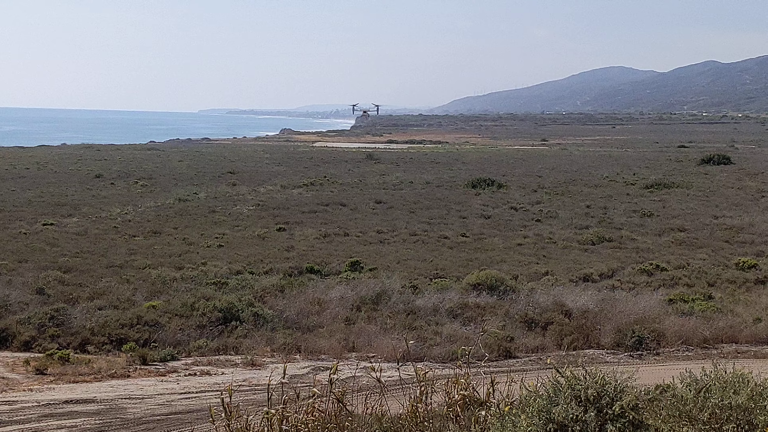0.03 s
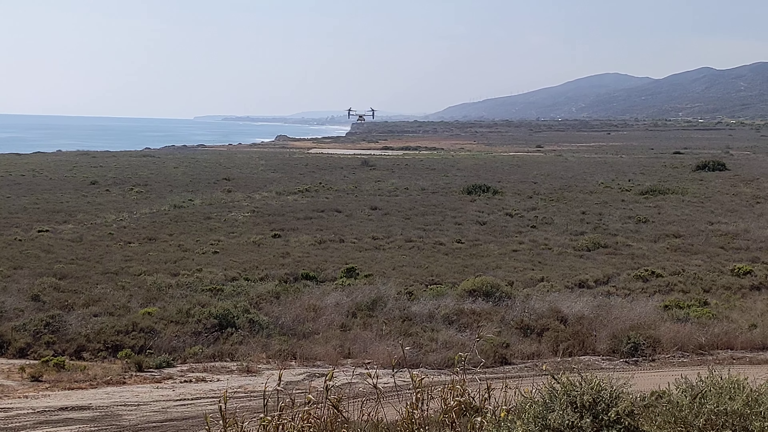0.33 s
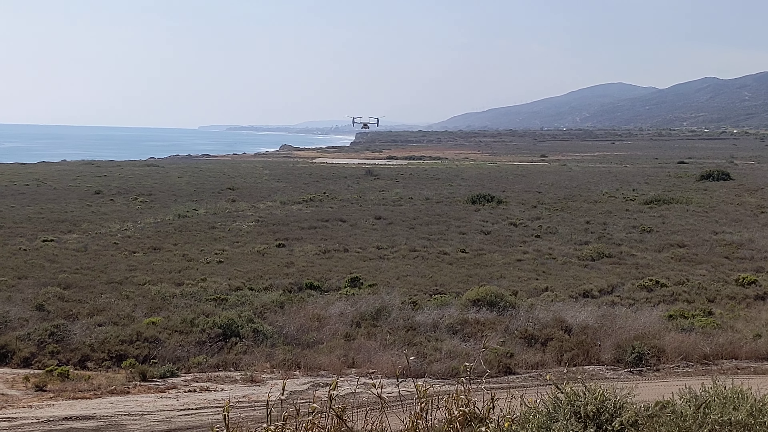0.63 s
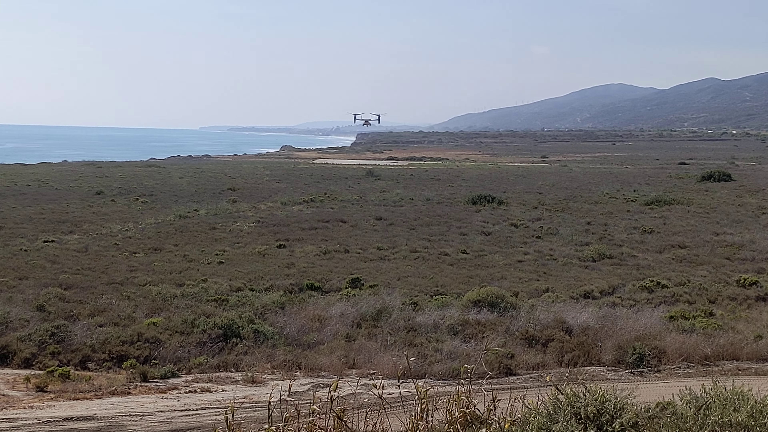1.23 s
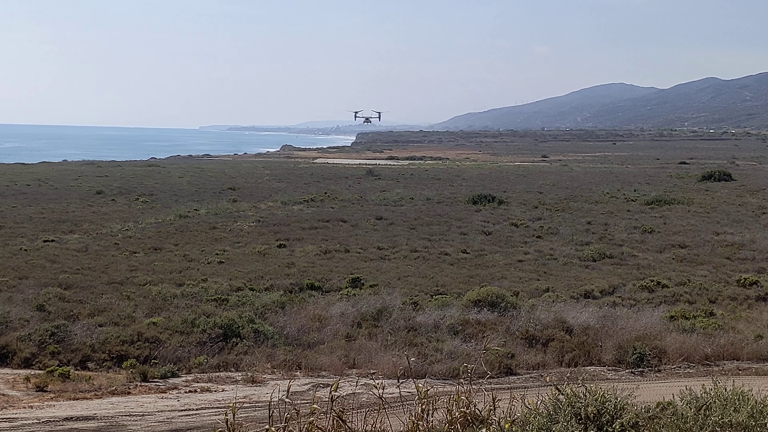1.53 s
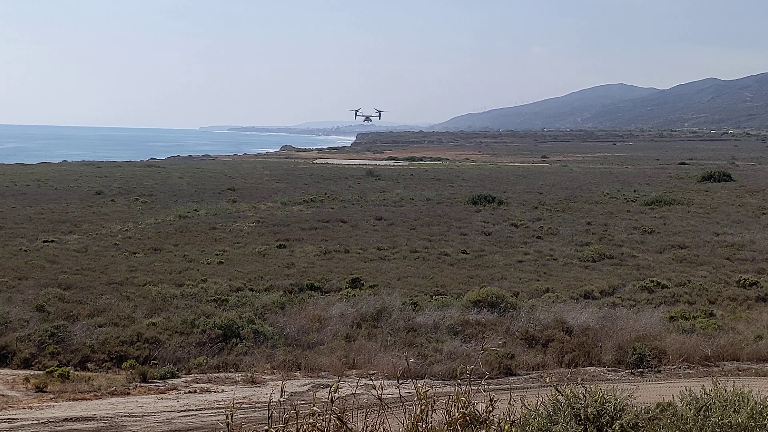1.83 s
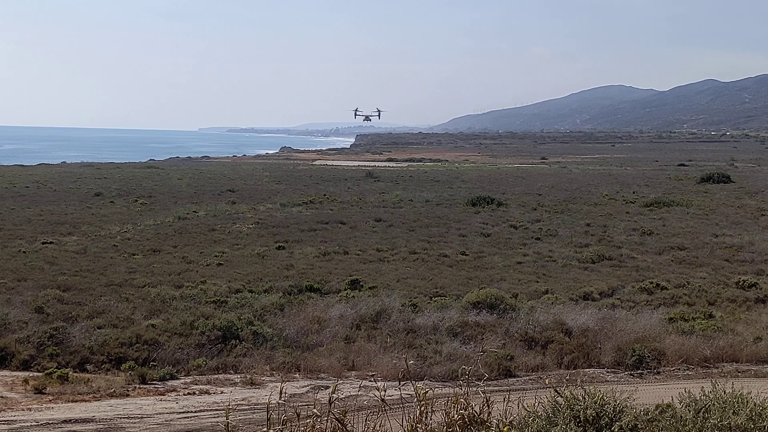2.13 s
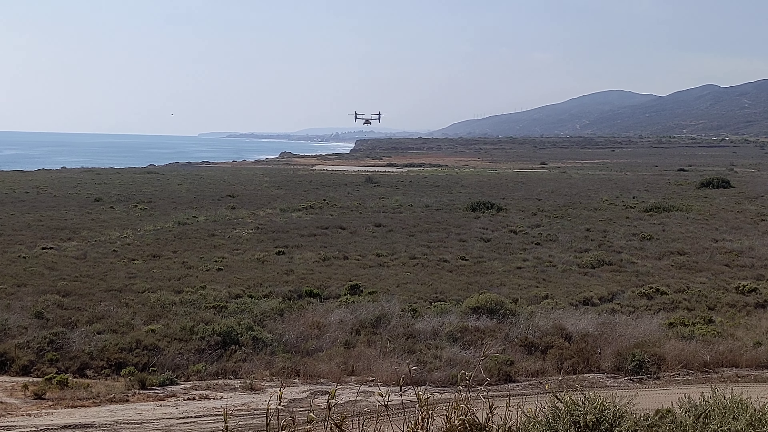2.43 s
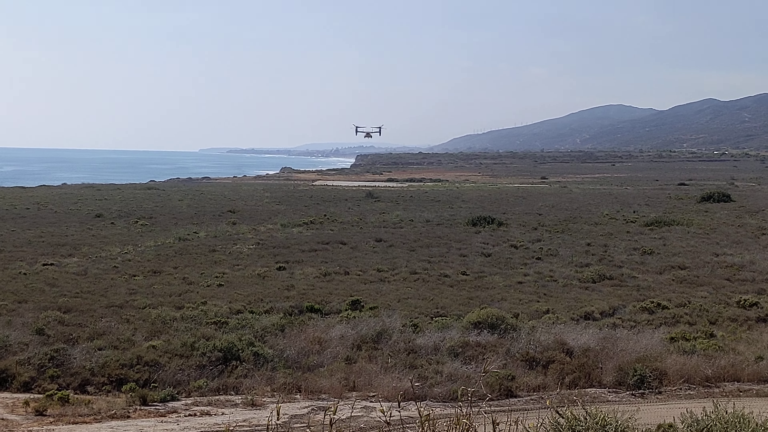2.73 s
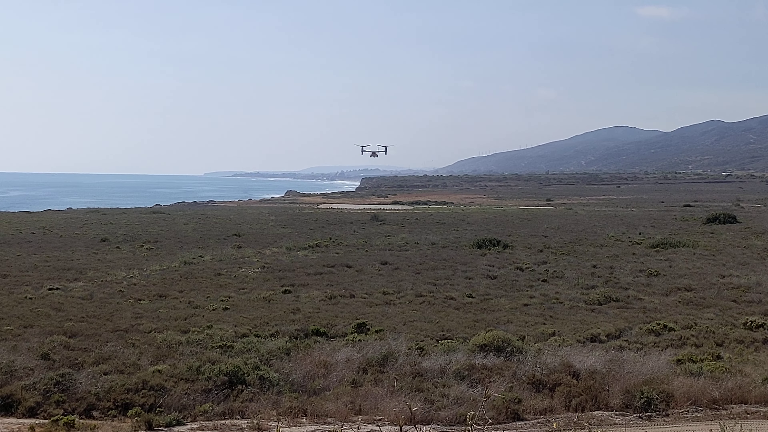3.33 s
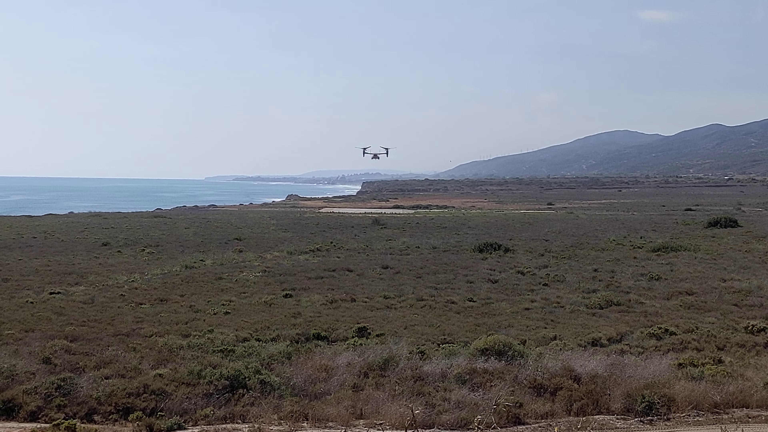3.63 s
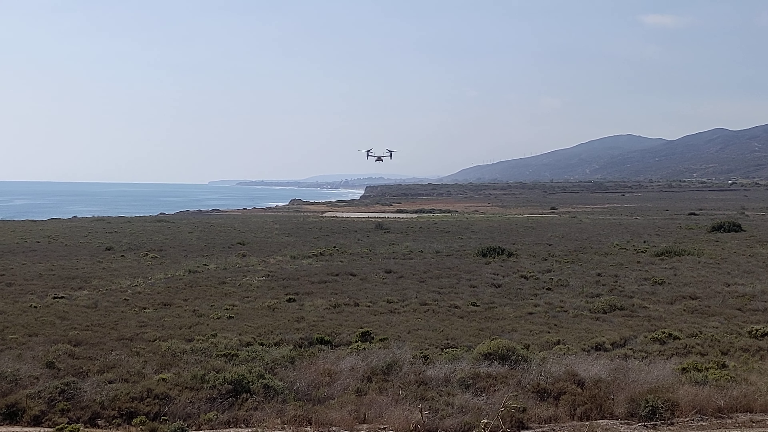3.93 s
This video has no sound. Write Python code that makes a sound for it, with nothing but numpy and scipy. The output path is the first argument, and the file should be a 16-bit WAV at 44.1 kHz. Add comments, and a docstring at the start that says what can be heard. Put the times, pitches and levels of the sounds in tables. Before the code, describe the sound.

Distant aircraft rotors beat rapidly over an engine roar, growing sharper as wind buffets the microphone.

```python
"""A far tiltrotor approaches over coastal scrub, its blades a soft flutter, about 20 beats a second, in a
roar of engines and rotor wash hollowed by a ground reflection. Dry grass hisses throughout.
From 1.1 s gusts buffet the left microphone harder; small clicks and a faint squeak sit close right.
From 2.4 s the beats harden into slaps and cracks as the blades cut their tip vortices.
A brief hum falls on the left near 2.7 s, and dry stalks brush together just before the end."""
import sys
import numpy as np
from scipy import signal
from scipy.fft import rfft, irfft
from scipy.io import wavfile

SR = 44100
rng = np.random.default_rng(int(sys.argv[2]) if len(sys.argv) > 2 else 0)


def unload_audio(sound):
    """Save the sound as a 16-bit wav file, at the path given as the first command line argument."""
    columns = np.transpose(np.atleast_2d(sound))
    # keep every value between -1 and 1, then stretch to whole-number steps
    steps = np.round(np.clip(columns, -1, 1) * 32767)
    wavfile.write(sys.argv[1], SR, steps.astype(np.int16))


N = 176400
TIME, FREQ = np.arange(N) / SR, np.fft.rfftfreq(N, 1 / SR)

# Noise colours of grass, wind, roar and cracks (frequency [Hz], level [dB/Hz] at 0 dB gain)
GRASS_EQ = [(2000, -105), (4500, -100.5), (6000, -101), (8500, -106), (11000, -113), (15500, -117)]
TUFT_EQ = [(3000, -112), (4500, -91), (5600, -94), (6700, -101), (8000, -118), (12000, -132)]
BRUSH_EQ = [(3000, -112), (6000, -103), (8500, -101), (15000, -119)]
RUMBLE_EQ = [(25, -63.5), (40, -47.5), (60, -39), (100, -42.5), (160, -48.5), (240, -56), (400, -71),
             (1000, -100), (4000, -150)]
EDDY_EQ = [(50, -63.5), (140, -51.5), (200, -48.5), (290, -50), (400, -55.5), (620, -61.5), (1000, -89),
           (2000, -102), (6000, -145)]
ROAR_EQ = [(40, -61.5), (100, -58.5), (200, -59.5), (320, -65.5), (500, -70.5), (750, -70), (1300, -71),
           (1900, -75), (2500, -76), (3000, -85.5), (3900, -91), (5000, -103), (8000, -125)]
FLARE_EQ = [(1200, -89), (1900, -73), (2750, -70), (3200, -84), (4500, -115)]
CRACK_EQ = [(150, -60.5), (400, -59.5), (700, -50), (900, -54), (1250, -59.5), (1600, -69), (2500, -79.5),
            (6000, -130), (12000, -160)]
RASP_EQ = [(700, -80.5), (1400, -65), (1900, -66.5), (2500, -69), (3100, -79.5), (4000, -86.5),
           (6000, -110), (12000, -150)]
# Level rides (time [s], gain [dB])
GRASS_RIDE = [(0, -6), (1.1, -4.5), (1.4, -1.5), (1.85, 0), (2.3, -3.5), (3.6, -3), (3.8, -1), (4, -1)]
TUFT_RIDE = [(0, -9), (.4, -4), (1.05, -5.5), (1.35, -11), (1.5, -16), (3.95, -18)]
ROAR_RIDE = [(0, -2.9), (.18, -1.8), (.3, 1.2), (.5, 0.2), (1.0, -0.11), (1.6, -2.5), (2.2, -0.35),
             (2.7, 1.3), (3.7, 0.95), (4, 1.5)]
SOFT_SLAP_RIDE = [(0, -31.5), (.7, -32), (1.0, -23.5), (1.5, -26.5), (2.2, -30), (2.52, -27.5),
                  (2.68, -18.5), (2.82, -23.5), (3.27, -21), (3.6, -16), (4, -21)]
CRACK_RIDE = [(0, -15), (.5, -17), (.9, -14), (1.0, -7), (1.08, -13.5), (1.4, -11.5), (1.69, -12.5),
              (1.74, -7.5), (1.79, -12), (2.03, -11.5), (2.08, -7.5), (2.25, -10), (2.52, -4.5), (2.72, -5),
              (2.82, -0.5), (2.97, -3.5), (3.07, -2), (3.17, -6), (3.22, -0.5), (3.41, -10.5), (3.46, -3.5),
              (3.55, 1.5), (3.61, 1.5), (3.66, 2.5), (3.71, 4.5), (3.77, 4), (3.82, -10.5), (3.87, -2),
              (4, -11)]
# Swells of brushing stalks and of brightness in the roar (time [s], half length [s], gain [dB])
BRUSHES = [(3.785, .035, 1), (3.94, .06, -2)]
FLARES = [(.47, .03, 0)]
# Rubbing squeaks (start [s], length [s], stick-slip rate [Hz], level [dB])
SQUEAKS = [(1.295, .08, 473, -60), (3.89, .055, 331, -61)]
# Close clicks (time [s], level re CLICK_DB [dB], left minus right [dB])
CLICKS = [(.308, -23, -12), (1.234, -18, -9), (1.365, -17, -13), (1.387, 7.5, -24), (2.272, -10, -9)]
# Ring of a click (frequency [Hz], relative level [dB])
CLICK_MODES = [(2950, 7), (3400, -6), (5500, 0), (6280, -1.5), (6500, -3), (7000, 0.5), (8480, -6),
               (8780, -5), (10620, -13), (13220, -15)]
# Gusts (time [s], half length [s], rumble gain [dB], eddy gain [dB])
GUSTS = [(.28, 0.06, 3, 0), (0.422, 0.024, 1.5, 1.5), (0.557, 0.16, -3, -20.5), (0.738, 0.026, 2.5, -14.5),
         (1.173, 0.041, 5.5, 4), (1.297, 0.077, 1.5, 8), (1.415, 0.07, 4, -4), (1.503, 0.025, 3.5, 0.5),
         (1.561, .025, 0.5, -6.5), (1.781, 0.037, 0.5, -2.5), (1.867, 0.028, 3, 4), (1.944, .02, -2.5, -1),
         (2, 0.02, -3, 3), (2.115, 0.05, -1, -2), (2.672, 0.077, -2, -3.5), (3.393, 0.059, 4, -2.5),
         (3.651, 0.064, 1.5, -2), (3.767, 0.034, 5.5, -3)]
# Thumps of large eddies (time [s], pitch [Hz], level [dB])
THUMPS = [(1.194, 198, -9), (1.264, 170, -8), (1.368, 130, -10), (1.5, 110, -7), (1.549, 110, -9),
          (1.767, 170, -11.5)]
# Path of the falling hum (time [s], pitch [Hz], level [dB])
HUM_PATH = [(2.62, 315, -55), (2.655, 300, -20), (2.745, 250, -27), (2.80, 219, -36), (2.88, 205, -55)]
# Stereo image of the aircraft (frequency [Hz], left minus right [dB], left phase lead [rad])
MIC_IMAGE = [(60, 11, -1), (300, -2, .2), (560, 5.5, 0.89), (710, .5, 0.24), (1015, -0.5, 1.66),
             (1239, 7, 1.11), (1645, 8, 4), (1760, -1, 6.7), (2180, 6, 7), (2570, -10.5, 8), (2990, 1, 8),
             (3730, 4, 9), (3900, 3, 10), (5000, 7, 10)]
# Tempo of the blades (time [s], beat rate [Hz])
BEAT_RATE = [(0, 20.44), (1.3, 20.42), (2.0, 20.33), (2.6, 20.25), (3.2, 20.21), (4, 20.2)]
# Rotor drone partials (multiple of the beat rate, relative level [dB])
DRONE_PARTIALS = [(2, -33.5), (3, -33.5), (4, -36.5), (5, -44), (6, -46), (7, -56.5)]
# Accented blade slaps (time [s], level [dB], pitch [Hz])
HARD_SLAPS = [(2.376, -20.5, 270), (2.624, -15.5, 264), (2.920, -11, 250), (3.069, -13.5, 278),
              (3.119, -9.5, 275), (3.169, -10.5, 282), (3.219, -10.5, 290), (3.317, -14.5, 255),
              (3.368, -11, 289), (3.467, -13.5, 300), (3.517, -16, 253), (3.566, -14, 265),
              (3.715, -6.5, 311), (3.764, -14.5, 328), (3.816, -15.5, 317)]
# Master fade (time [s], gain [linear])
MASTER_FADE = [(.03, 0), (.05, 1), (3.994, 1), (4, 0)]

CLICK_DB, CLICK_RING_S, SNAP_DB, SNAP_S, CLICK_TAIL_DB, CLICK_TAIL_S = -48.5, .0048, 11.5, .0018, -17, .025
SQUEAK_HZ, SQUEAK_WIDTH_HZ, SQUEAK_SWEEP_HZ, SQUEAK_GLIDE, SQUEAK_ROUGH = 4300, 850, 800, .05, .006
BREEZE_LEFT_DB, BREEZE_RIGHT_DB, GUST_RIGHT_DB = -9, -10, -13
EDDIES_PER_S, EDDY_WASH_DB, THUMP_CYCLES = 300, -10, .59
GROUND_DELAY_S, GROUND_SHARE = .001887, .2
ROAR_SWAY_DB, ROAR_FLICKER_DB, DIFFUSE_DB = .56, .43, -6
DRONE_LAG_S, DRONE_RISE_DB_PER_S = .0029, 2.5
SLAP_HZ, SLAP_LAG_S, SLAP_RISE_S, SLAP_FALL_S, SLAP_SPREAD_DB = 275.6, .0003, .0033, .0052, 1.47
CRACK_WIDTH_S, CRACK_LEAD_S, CRACK_SPREAD_DB, SCRUB_TAIL_DB, SCRUB_TAIL_S = .0045, .0016, .72, -7.5, .018
RASP_FOLLOW = .53  # share of the crack's swing in dB that its bright edge follows
BEAT_ANCHOR_S = 3.169  # one blade passage lands here
LOW_CUT_HZ, HIGH_CUT_HZ = 35, 15750


def amp(db):
    """Decibels to gain."""
    return 10 ** (np.asarray(db) / 20)


def curve(points, t=TIME):
    """Reads a table over time."""
    return np.interp(t, *np.transpose(points))


def over_hz(points, column=1):
    """Reads a table over log frequency."""
    table = np.array(points)
    return np.interp(np.log(FREQ + 1), np.log(table[:, 0]), table[:, column])


def colour(x, eq):
    """Gives white noise a spectrum in dB per Hz."""
    return irfft(rfft(x) * amp(over_hz(eq)) * np.sqrt(SR / 2), N)


def drift(rate_hz):
    """Smooth random modulator of unit spread."""
    x = irfft(rfft(rng.standard_normal(N)) * np.exp(-(FREQ / rate_hz) ** 2), N)
    return x / x.std()


def add(mix, start_s, sound):
    """Drops a sound into the mix."""
    part = mix[..., round(start_s * SR):][..., :sound.shape[-1]]
    part += sound[..., :part.shape[-1]]


def swells(rows, eq):
    """Coloured noise that comes and goes in brief swells."""
    envelope = sum(amp(db) * np.exp(-((TIME - s) / half) ** 2) for s, half, db in rows)
    return colour(rng.standard_normal(N), eq) * envelope


def grass():
    """A wide, grainy bed of dry grass, with brushing stalks and a nearer tuft rustling on the right."""
    hiss = colour(rng.standard_normal((2, N)) * amp(curve(GRASS_RIDE) + .99 * drift(250)), GRASS_EQ)
    tuft = colour(rng.standard_normal(N) * amp(curve(TUFT_RIDE) + 1.8 * drift(60)), TUFT_EQ)
    stalks = np.array([swells(BRUSHES, BRUSH_EQ), swells(BRUSHES, BRUSH_EQ)])
    return hiss + stalks + tuft * amp([[-9], [0]])


def squeaks():
    """Something sticks and slips: slightly rising harmonics through one high, upswept resonance."""
    out = np.zeros(N)
    for s, length, rate_hz, db in SQUEAKS:
        progress = np.clip((TIME - s) / length, 0, 1)
        pitch_hz = rate_hz * (1 + SQUEAK_GLIDE * (progress - .5) + SQUEAK_ROUGH * drift(300))
        phase = 2 * np.pi * np.cumsum(pitch_hz) / SR
        peak_hz = SQUEAK_HZ + SQUEAK_SWEEP_HZ * (progress - .5)
        tone = sum(np.exp(-((k * rate_hz - peak_hz) / SQUEAK_WIDTH_HZ) ** 2) * np.sin(k * phase)
                   for k in range(6, 18))
        out += amp(db) * np.sin(np.pi * progress) * tone
    return out * amp([[-4], [0]])


def clicks():
    """Small hard snaps with a brief high ring, panned right."""
    out, t = np.zeros((2, N)), np.arange(SR // 10) / SR
    snap_band = signal.butter(1, [2400, 8000], "band", fs=SR)
    for s, db, pan_db in CLICKS:
        ring = sum(amp(level) * np.sin(2 * np.pi * (hz * t + rng.random())) for hz, level in CLICK_MODES)
        ring *= np.exp(-t / CLICK_RING_S)
        snap = signal.lfilter(*snap_band, rng.standard_normal(len(t)))
        snap *= np.exp(-t / SNAP_S) + amp(CLICK_TAIL_DB) * np.exp(-t / CLICK_TAIL_S)
        add(out, s, amp(CLICK_DB + db) * (ring + amp(SNAP_DB) * snap) * amp([[pan_db], [0]]))
    return out


def wind():
    """A breeze rumbles on both microphones; gusts swell it and pelt the left one with small eddies."""
    rumble = flutter = 0
    for s, half, rumble_db, eddy_db in GUSTS:
        swell = np.exp(-((TIME - s) / half) ** 4)
        rumble += amp(rumble_db) * swell
        flutter += amp(eddy_db) * swell
    left_air, right_air, wash = rng.standard_normal((3, N))
    eddies = np.sign(wash) * (rng.random(N) < EDDIES_PER_S / SR) * np.sqrt(SR / EDDIES_PER_S)
    left = colour(left_air * np.hypot(amp(BREEZE_LEFT_DB), rumble), RUMBLE_EQ)
    left += colour((eddies + amp(EDDY_WASH_DB) * wash) * flutter, EDDY_EQ)
    right = colour(right_air * np.hypot(amp(BREEZE_RIGHT_DB), amp(GUST_RIGHT_DB) * rumble), RUMBLE_EQ)
    return np.array([left, right])


def thumps():
    """Large eddies hit the microphone, each a low pulse about one cycle long."""
    out = np.zeros(N)
    for s, hz, db in THUMPS:
        cycles = hz * (TIME - s)
        out -= amp(db) * np.cos(2 * np.pi * cycles) * np.exp(-(cycles / THUMP_CYCLES) ** 2)
    return out


def hum():
    """In one gust a wavering hum falls and fades."""
    times, hz, db = np.transpose(HUM_PATH)
    cycles = np.cumsum(np.interp(TIME, times, hz) * (1 + .0251 * drift(60))) / SR
    return amp(np.interp(TIME, times, db, -np.inf, -np.inf)) * np.sin(2 * np.pi * cycles)


def air_shimmer(x, depth_db=2):
    """Moving air makes each band of a far sound fade in and out."""
    centres_hz, spectrum = np.geomspace(100, 5000, 12), rfft(x)
    bands = [irfft(spectrum * np.interp(FREQ, centres_hz, row), N) for row in np.eye(len(centres_hz))]
    return sum(band * amp(depth_db * drift(24)) for band in bands)


def ground_bounce(x):
    """An inverted reflection off the ground hollows the sound like a comb filter."""
    return irfft(rfft(x) * (1 - GROUND_SHARE * np.exp(-2j * np.pi * FREQ * GROUND_DELAY_S)), N)


def mic_pair(x):
    """The two microphones hear the aircraft with different colour and delay."""
    left_response = amp(over_hz(MIC_IMAGE) / 2) * np.exp(.5j * over_hz(MIC_IMAGE, column=2))
    return irfft(rfft(x) * np.array([left_response, 1 / left_response]), N)


def roar():
    """Broad roar of engines and rotor wash, swaying and flickering on its way."""
    level_db = curve(ROAR_RIDE) + ROAR_SWAY_DB * drift(11) + ROAR_FLICKER_DB * drift(52)
    return air_shimmer(colour(rng.standard_normal(N), ROAR_EQ)) * amp(level_db)


def rotor_drone(beats):
    """The low push of the blades: harmonics of the beat, building as the aircraft nears."""
    phase = 2 * np.pi * (beats - DRONE_LAG_S * curve(BEAT_RATE))
    drone = sum(amp(db + 1.5 * drift(2.8)) * np.cos(k * phase) for k, db in DRONE_PARTIALS)
    return drone * amp(DRONE_RISE_DB_PER_S * (TIME - 3.5))


def blade_slaps(beat_s, accent, skew, jitter):
    """Each passing blade gives a short hollow pulse; a hard slap takes over the beat nearest to it."""
    rows = np.array(HARD_SLAPS)
    nearest = abs(beat_s[:, None] - rows[:, 0]).argmin(axis=1)
    hard_s, hard_db, hard_hz = rows[nearest].T
    is_hard = abs(beat_s - hard_s) < .5 / curve(BEAT_RATE)
    t = TIME - np.where(is_hard, hard_s, beat_s + SLAP_LAG_S - .00024 * jitter)
    pitch_hz = np.where(is_hard, hard_hz, SLAP_HZ)
    level_db = np.where(is_hard, hard_db, curve(SOFT_SLAP_RIDE, beat_s) + SLAP_SPREAD_DB * accent)
    envelope = np.exp(-(t / np.where(t < 0, SLAP_RISE_S, SLAP_FALL_S)) ** 2)
    return -amp(level_db) * envelope * np.cos(2 * np.pi * pitch_hz * t + .2 * skew)


def vortex_cracks(beat_s, accent, jitter):
    """Blades cut their tip vortices: noise bursts with a raspy edge, trailing off over the scrub."""
    t = TIME - beat_s + CRACK_LEAD_S + .0007 * jitter
    tail = np.clip(t / CRACK_WIDTH_S, 0, 1) * np.exp(-abs(t) / SCRUB_TAIL_S)
    envelope = np.exp(-(t / CRACK_WIDTH_S) ** 2) + amp(SCRUB_TAIL_DB) * tail
    force_db = curve(CRACK_RIDE, beat_s) + CRACK_SPREAD_DB * accent
    body = colour(envelope * amp(force_db) * rng.standard_normal(N), CRACK_EQ)
    rasp = colour(envelope * amp(RASP_FOLLOW * force_db) * rng.standard_normal(N), RASP_EQ)
    return body + rasp


def rotors():
    """Drone, slap and crack lock to the blade passages, each beat varying a little in weight and timing."""
    beats = np.cumsum(curve(BEAT_RATE)) / SR
    beats -= np.interp(BEAT_ANCHOR_S, TIME, beats)
    index = np.round(beats).astype(int)
    beat_s = TIME - (beats - index) / curve(BEAT_RATE)  # time of the nearest passage
    per_beat = rng.standard_normal((index[-1] - index[0] + 1, 4))
    slap_accent, crack_accent, skew, jitter = per_beat[index - index[0]].T
    slaps = blade_slaps(beat_s, slap_accent, skew, jitter)
    cracks = vortex_cracks(beat_s, crack_accent, jitter)
    return rotor_drone(beats) + slaps + ground_bounce(air_shimmer(cracks))


def scene():
    """The aircraft ahead, its roar scattered wide over the land, wind and small details up close."""
    aircraft = mic_pair(rotors() + ground_bounce(roar() + swells(FLARES, FLARE_EQ)))
    scattered = amp(DIFFUSE_DB) * np.array([roar(), roar()])
    buffeting = wind() + np.array([thumps() + hum(), np.zeros(N)])
    return aircraft + scattered + buffeting + grass() + clicks() + squeaks()


def record(dry):
    """Master chain: a steep low cut, a short fade at each end and a high cut."""
    low_cut = FREQ ** 16 / (FREQ ** 16 + float(LOW_CUT_HZ) ** 16)
    faded = irfft(rfft(dry) * low_cut, N) * curve(MASTER_FADE)
    high_cut = signal.firwin(511, HIGH_CUT_HZ, window=("kaiser", 9), fs=SR)
    return signal.oaconvolve(faded, high_cut[None], "same")


dry = scene()
out = record(dry)
unload_audio(out)
```